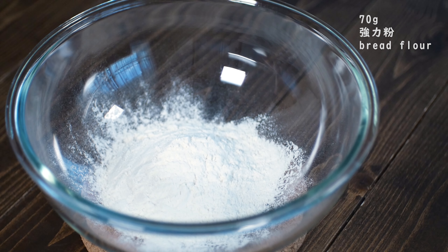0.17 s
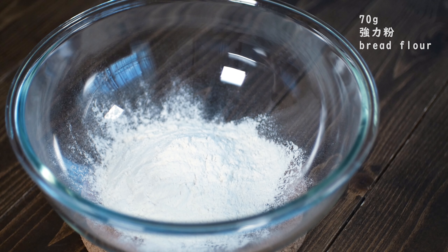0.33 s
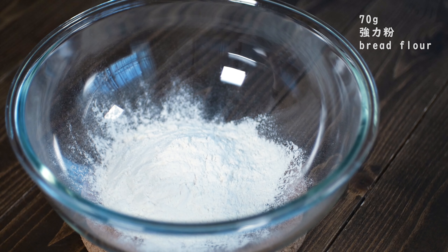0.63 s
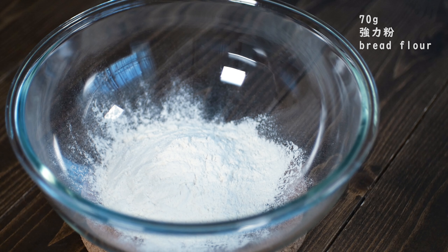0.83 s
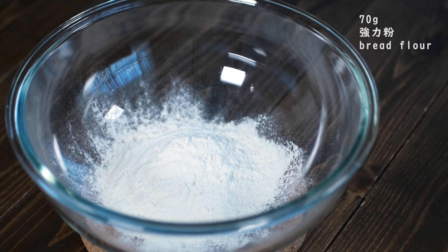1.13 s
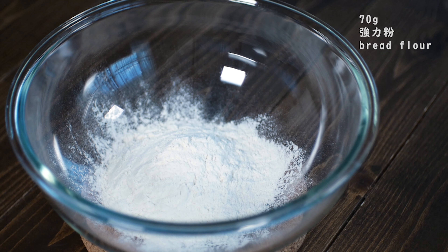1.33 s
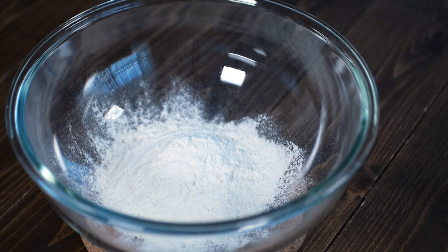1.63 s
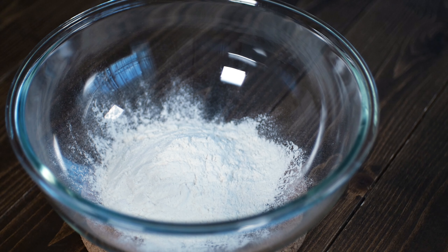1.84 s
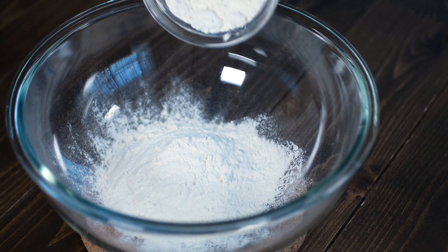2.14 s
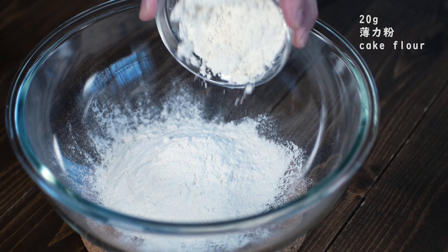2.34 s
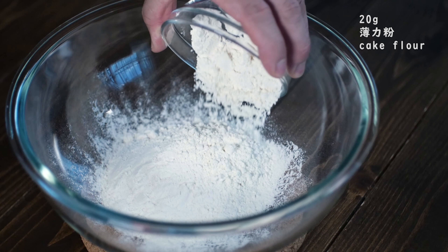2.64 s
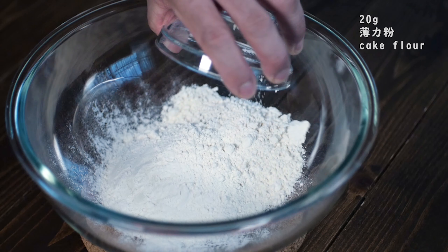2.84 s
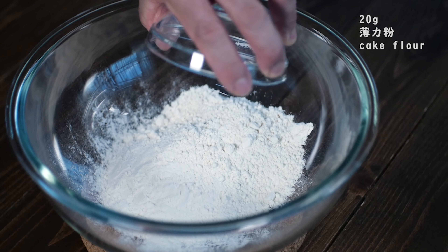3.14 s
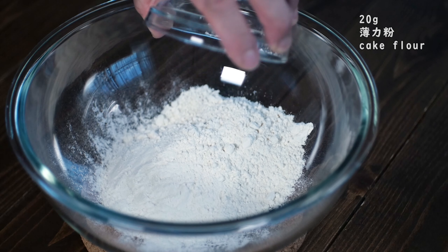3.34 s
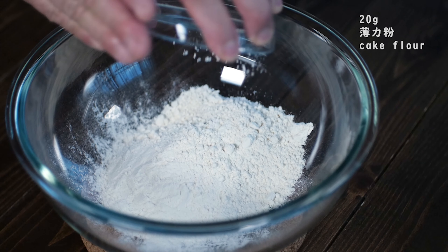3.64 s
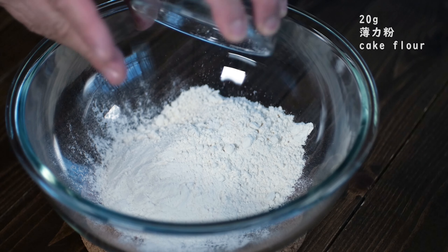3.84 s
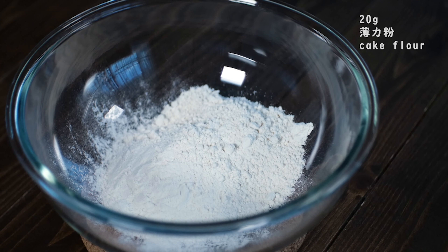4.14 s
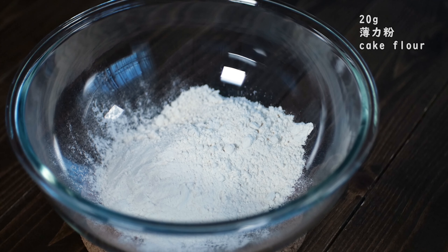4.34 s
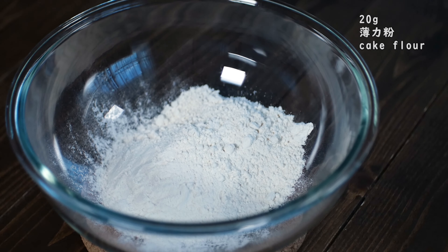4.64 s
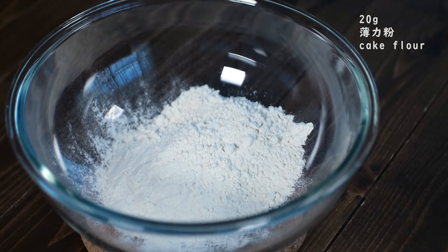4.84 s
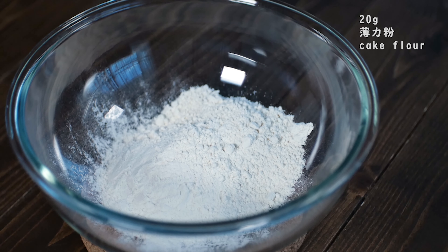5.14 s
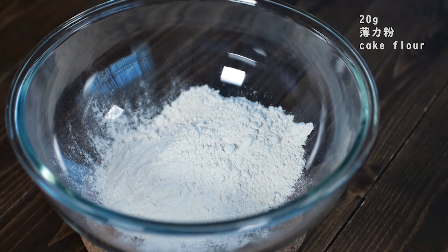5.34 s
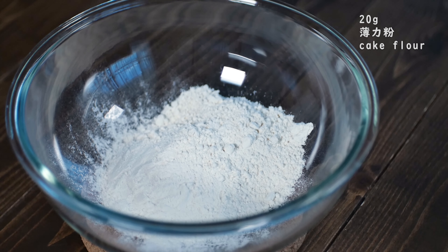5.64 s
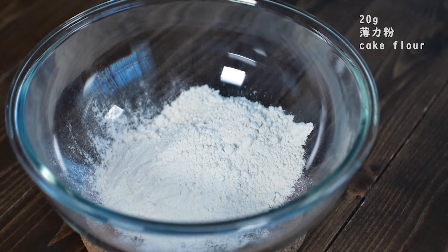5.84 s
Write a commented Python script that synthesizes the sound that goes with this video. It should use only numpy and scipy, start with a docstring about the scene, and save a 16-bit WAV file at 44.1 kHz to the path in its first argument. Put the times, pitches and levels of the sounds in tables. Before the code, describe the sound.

Close knocks of glass on wood, a brief scuff and light finger taps on glass, over faint sleeve rustle indoors.

```python
"""A glass dish knocks down on a wooden table, close to a near-mono microphone in a small dry room.
Its foot scuffs the wood, fingers pat a small empty dish, and more knocks follow at the end.
Each blow rings the table top or the glass and comes back briefly off the walls.
Behind them sleeves rustle over a soft room hush, and a far engine climbs slowly in pitch."""
import sys
import numpy as np
from scipy import signal
from scipy.fft import rfft, irfft, next_fast_len
from scipy.io import wavfile
from scipy.ndimage import uniform_filter1d

SR = 44100
rng = np.random.default_rng(int(sys.argv[2]) if len(sys.argv) > 2 else 0)


def to_wav(s):
    """Save 16-bit WAV."""
    ch = np.atleast_2d(s).T  # columns
    pcm = np.round(np.clip(ch, -1, 1) * 32767)  # PCM
    wavfile.write(sys.argv[1], SR, pcm.astype(np.int16))


N = 264159
LEAD = SR // 10  # samples ahead of t = 0, so a blow can already be sounding at the start

# Dishes landing near the microphone, rim edge by rim edge:
# t/s, blow/dB, contact/ms, bounce/dB, table ring/dB, board hum/dB, glass ring/dB
KNOCKS = [(-.012, -12.5, 0.89, 0.5, -17, -13, -60), (4.775, -42, 2, -10, -17, -6.5, -90),
          (5.3543, -17.5, 1.43, 0.5, -23.5, -13.5, -83), (5.4011, -18, 0.98, -2.5, -22.5, -8.5, -86),
          (5.6242, -14.5, 0.63, -8, -11.5, -25, -58), (5.661, -10.5, 0.36, -4, -12.5, -20, -41)]
# Modes that a landing excites: f/Hz, level/dB, t60/s
THUD_MODES = [(537, -3.5, 0.022), (820, -1.5, 0.0049), (1310, -0.5, 0.0039), (2136, -20, 0.018),
              (2530, -14, 0.015)]  # the contact itself
TABLE_MODES = [(329, 5, 0.094), (343, -4.5, 0.26), (385, 3, 0.22), (462, -17, 0.1), (526, -1, 0.16),
               (572, 3.5, 0.096), (620.4, 5.5, 0.23), (648, -4, 0.15), (687, 4, 0.067), (707, -4, 0.19),
               (824, 0, 0.12), (878, 5, 0.16), (923, -2, 0.28), (941, 2.5, 0.21), (1008.5, -3.5, 0.24),
               (1110, -7, 0.3), (1202, 9, 0.069), (1210, -28, 0.13), (1403, -6.5, 0.19), (1540, -15, 0.25),
               (1620, -1.5, 0.092)]  # the ring of the table top
BOARD_MODES = [(222.5, -21.5, 1), (310, -42, 0.067), (449.6, 0, 0.31), (410, -27, 0.14), (675, -2.5, 0.19),
               (140.6, -9, 0.22), (180, -24, 0.27), (588, -8, 0.16)]  # the lower hum of its board
BIG_DISH_MODES = [(1798, 0, .73), (2466, 2, .19), (1949, 0, .22), (2810, -10, .25)]
# The crack of glass on wood: f/Hz, level/dB
CRACK_COLOUR = [(800, -9), (2000, 12.5), (3500, -6), (5000, -8), (8000, -20.5), (15000, -43)]
def knocks():
    """Glass lands on wood with a push and one bounce: longer contact dulls the thud and the wood's ring."""
    bus = np.zeros((2, N + LEAD))
    t = np.arange(SR // 20) / SR
    bounce_s = 0.006585
    for s, db, contact_ms, bounce_db, table_db, board_db, glass_db in KNOCKS:
        push = np.sin(np.pi * np.arange(0, 1, 1000 / (contact_ms * SR))) ** 2
        push = undb(db) * push / push.sum()
        thud = signal.fftconvolve(ring(THUD_MODES), push)
        # a blow that rings the table more also cracks more and reaches the walls more
        crack = undb(db - 4 + 1.46 * table_db) * burst(np.exp(-t / 0.005), CRACK_COLOUR)
        room_db = table_db + 7
        add(bus, s, thud, room_db)
        add(bus, s + bounce_s, undb(bounce_db) * thud, room_db)
        add(bus, s, crack, room_db=0.5)
        add(bus, s, undb(glass_db) * ring(BIG_DISH_MODES), room_db=-12)
        for wood_db, modes in (table_db, TABLE_MODES), (board_db, BOARD_MODES):
            wood = ring(modes, spot_db=1.5, damp_s=0.33)  # the hand on the dish quiets the wood
            add(bus, s, undb(wood_db) * signal.fftconvolve(wood, push), room_db - 8)
    return highpass(bus, hz=156, order=3)  # wood and glass push hardly any air in the deep bass


# Fingers and nails on the small dish, close up:
# t/s, click/dB, spread/ms, flesh/dB, glass ring/dB, click tilt/(dB per octave)
PATS = [(0.678, -44.5, 2.7, -46, -75, -8.5), (0.691, -51, 2.1, -70, -80, 0),
        (3.6279, -28, 1.2, -31, -36, -1.5), (3.6813, -41, 0.83, -46, -63, -9.5),
        (3.759, -51.5, 4, -55, -77, 3), (3.765, -46, 1.6, -70, -60, 2), (3.836, -57.5, 8, -61, -80, 7),
        (3.865, -67, 7.1, -68, -77, 7), (4.4306, -38, 0.58, -54, -65, -6), (4.439, -54, 3.3, -62, -66, -2),
        (4.478, -66, 3.2, -64, -59, 2), (4.585, -74, 3, -67, -70, 0), (4.712, -61, 3, -70, -71, -9),
        (4.77, -64, 3, -64, -65, 3), (5.06, -67, 7.6, -72, -84, 19)]
# The click of skin or nail: f/Hz, level/dB
CLICK_COLOUR = [(300, -24), (1200, -4.5), (2500, 1), (4500, 5), (6000, 4.5), (10000, -5), (13000, 0),
                (15500, 0)]
# Modes that a pat excites: f/Hz, level/dB, t60/s
SLAP_MODES = [(354, -2, 0.028), (670, 8.5, 0.0067), (1260, -1, 0.017), (1770, 0.5, 0.016)]  # flesh on glass
SMALL_DISH_MODES = [(6970, -10, 0.2), (7130, -11.5, 0.2), (6990, -10, 0.33), (7100, -10, .12),
                    (8480, -6, 0.038), (4170, -25, .03)]  # the high ring
LOW_RIM_MODES = [(4006, -1.5, 0.087), (4120, 2, 0.056)]  # the rim's lowest pair
def pats(room_db=-11):
    """A finger meets the dish: a click or brush of skin, a soft slap and the ring of the damped glass."""
    bus = np.zeros((2, N + LEAD))
    t = np.arange(SR // 10) / SR
    hz, colour_db = np.transpose(CLICK_COLOUR)
    for s, click_db, spread_ms, flesh_db, glass_db, tilt in PATS:
        age = t * 1000 / spread_ms
        tilted = np.transpose([hz, colour_db + tilt * np.log2(hz / 4000)])
        click = burst(np.e * age * np.exp(-age), tilted)
        add(bus, s, undb(click_db) * click, room_db)
        add(bus, s, undb(flesh_db) * ring(SLAP_MODES), room_db - 2.5)
        add(bus, s, undb(glass_db) * ring(SMALL_DISH_MODES, spot_db=1.5), room_db)
        rim_db = -24 + 0.62 * glass_db  # the lowest pair grows more slowly than the high ring
        add(bus, s, undb(rim_db) * ring(LOW_RIM_MODES), room_db)
    return highpass(bus, hz=200, order=2)


# Runs of a dish's foot on the table, close up: t/s at full strength, level/dB, hold/s
SCUFFS = [(0.72, -41, 0.0034), (.729, -30.5, .014), (0.77, -41, 0.0032)]
# Glass rubbing on wood: f/Hz, level/dB
SCUFF_COLOUR = [(71, -31), (120, -11.5), (265, -5), (649, -8.5), (796, -2.5), (1270, -19), (1870, -12.5),
                (2160, -17), (2440, -3.5), (3300, -19.5), (3660, -16), (4960, -16.5), (5960, -21),
                (8250, -24.5), (15500, -42)]
# The sliding dish's faint ring: f/Hz, level/dB, t60/s
SCUFF_MODES = [(1561, -54, .9)]
def scuff(rise_db_per_s=3000, fall_db_per_s=2500):
    """The foot slides in dense slips of uneven size; each run rises, holds and dies."""
    slips = rng.standard_normal(N) * undb(1.5 * rng.exponential(size=N))
    slips *= rng.random(N) < 0.3
    t = np.arange(N) / SR
    envelope = np.zeros(N)
    for s, db, hold_s in SCUFFS:
        before, after = np.maximum(s - t, 0), np.maximum(t - s - hold_s, 0)
        envelope += undb(db - rise_db_per_s * before - fall_db_per_s * after)
    bus = np.zeros((2, N + LEAD))
    add(bus, 0, unit(shape(slips, SCUFF_COLOUR)) * envelope, room_db=-11)
    add(bus, 0.735, ring(SCUFF_MODES), room_db=-16)
    return bus


# Echoes off the surfaces nearest the table: delay/ms, level/dB
ECHOES = [(19, -14), (31, -13.5), (47, -15)]
# Faint stereo spread of the ringing tail: f/Hz, side minus mid/dB
TAIL_WIDTH = [(60, -32), (150, -39), (400, -73), (800, -87), (1500, -38), (2500, -22), (4400, -32),
              (8000, -15), (15000, -15)]
def room(sound, low_t60_s=0.29, treble_t60_s=0.21, rise_s=0.0023, knee_s=0.2):
    """A few hard echoes and a dense tail that swells and dies, treble first; mid and a weak side."""
    t = np.arange(SR // 2) / SR
    tails = []
    for _ in range(2):
        noise = rng.standard_normal(len(t))
        low = shape(noise, [(1500, 5.0), (4000, -44)])
        tail = low * decay(t, low_t60_s) + (noise - low) * decay(t, treble_t60_s)
        tail *= (1 - np.exp(-t / rise_s)) * np.exp(-(t / knee_s) ** 2)
        tails.append(undb(8) * tail / np.sqrt(np.sum(tail ** 2)))
    mid, side = tails
    for ms, db in ECHOES:
        mid[int(ms * SR / 1000)] += undb(db)
    side = shape(side, TAIL_WIDTH)
    return np.array([signal.fftconvolve(sound, response)[:len(sound)] for response in (mid, side)])


# Sleeves and hands moving at the table: t/s, level/dB
RUSTLE_LEVEL = [(0.0, -54), (0.18, -64.5), (0.55, -61), (0.68, -59.5), (0.83, -65.5), (1.08, -64.5),
                (1.5, -60), (1.67, -64.5), (1.88, -65.5), (2.1, -61), (2.37, -65.5), (3.15, -65.5),
                (3.33, -59.5), (3.55, -56), (3.85, -61), (4.3, -60.5), (4.99, -65), (5.27, -67),
                (5.99, -63)]
# Cloth rubbing: f/Hz, level/dB
RUSTLE_COLOUR = [(300, -7), (1000, 6), (2500, 0.5), (5000, -3), (9000, -6), (15000, -10.5)]
def sleeves():
    """Cloth rubs as the hands move: noise that swells and sinks, its topmost treble eased down."""
    cloth = unit(shape(rng.standard_normal(N), RUSTLE_COLOUR))
    top = shape(cloth, [(7000, -33), (11000, -4)])
    softened = cloth - top + top * undb(-2.5)
    return softened * undb(curve(RUSTLE_LEVEL) + 0.5 * walk(14))


# Room tone around the microphone: f/Hz, level/dB
HUSH_COLOUR = [(15, -76), (25, -34), (64, -6), (84, -9.5), (107, -8.5), (222, -4.5), (260, -4.5),
               (423, -1.5), (459, -6.5), (584, -2.5), (829, -3.5), (1500, -10.5), (2370, -23.5),
               (15600, -38.5)]
# Faint stereo spread of the hush: f/Hz, side minus mid/dB
HUSH_WIDTH = [(60, -14), (110, -32), (200, -28.5), (380, -30.5), (700, -32), (1290, -33), (2380, -12.5),
              (4400, -5.5), (8120, -1), (15000, 2)]
# Narrow bands where the room favours the hush: f/Hz, width/Hz, level/dB
ROOM_HUMS = [(224.3, 11, -67.5), (420.2, 13, -69.5)]
def hush(level_db=-54.5):
    """Soft noise with two room resonances, its bass and middle wavering a little; mid and side."""
    low, high = (shape(rng.standard_normal(N), HUSH_COLOUR) for _ in range(2))
    gain = undb(level_db) / np.std(low)
    crossover = [(800, -1.5), (2500, -15.5)]
    bass = shape(low, crossover) * undb(0.09 * walk(2.3) + 0.56 * walk(14))
    treble = high - shape(high, crossover)
    mid = gain * (bass + treble)
    for hz, width_hz, db in ROOM_HUMS:
        resonance = signal.iirpeak(hz, hz / width_hz, fs=SR)
        mid += undb(db) * unit(signal.lfilter(*resonance, rng.standard_normal(N)))
    side = gain * shape(shape(rng.standard_normal(N), HUSH_COLOUR), HUSH_WIDTH)
    return mid, side


# The far engine as it reaches the room: t/s, level/dB
ENGINE_LEVEL = [(0.0, -56), (0.28, -72), (0.8, -63.5), (0.99, -74), (1.31, -62.5), (2.06, -67),
                (2.2, -76.5), (3.75, -74.5), (3.81, -69), (4.19, -73), (4.28, -65), (4.81, -74), (5.2, -88)]
def engine(idle_hz=62.7, climb_from_s=0.67, climb_hz_per_s=11):
    """A far engine idles, then gains speed evenly: one low tone of wavering level."""
    hz = idle_hz + climb_hz_per_s * np.maximum(np.arange(N) / SR - climb_from_s, 0)
    level = undb(curve(ENGINE_LEVEL) + 0.79 * walk(5.3))
    return np.sqrt(2) * level * np.sin(2 * np.pi * np.cumsum(hz) / SR)


def ring(modes, spot_db=0, damp_s=9):
    """Modes decay after a blow; with spot_db, the struck spot scatters their strengths and signs."""
    hz, db, t60 = np.transpose(modes)[:, :, None]
    t = np.arange(int(SR * min(t60.max(), 0.5))) / SR
    gain = undb(db + spot_db * rng.standard_normal(hz.shape))
    if spot_db:
        gain *= rng.choice([-1, 1], hz.shape)
    fade = np.minimum(1, 5 * (1 - t / t[-1])) * np.exp(-(t / damp_s) ** 2)
    return np.sum(gain * np.sin(2 * np.pi * hz * t) * decay(t, t60), axis=0) * fade


def burst(envelope, colour):
    """A short noisy contact, evened out in spectrum, then coloured; it carries the envelope's energy."""
    spectrum = rfft(rng.standard_normal(len(envelope)) * envelope)
    even = irfft(spectrum / np.abs(spectrum) ** 0.8, len(envelope))
    contact = shape(even, colour) * np.linspace(1, 0, len(even)) ** 4
    return contact * np.sqrt(np.sum(envelope ** 2) / np.sum(contact ** 2))


def add(bus, s, sound, room_db):
    """Place a sound at time s: row 0 goes straight to the microphone, row 1 to the walls."""
    start = int(s * SR) + LEAD
    part = sound[:bus.shape[1] - start]
    bus[:, start:start + len(part)] += [part, undb(room_db) * part]


def shape(x, colour):
    """Colour x by (f/Hz, level/dB) points."""
    hz, db = np.transpose(colour)
    size = next_fast_len(len(x))
    f = np.maximum(np.arange(size // 2 + 1) * SR / size, 1)
    gain = undb(np.interp(np.log(f), np.log(hz), db))
    return irfft(rfft(x, size) * gain, size)[:len(x)]


def walk(rate_hz):
    """Random levels, each held for 1 / rate_hz seconds, smoothed twice."""
    hold = int(SR / rate_hz)
    steps = np.repeat(rng.standard_normal(N // hold + 1), hold)
    return uniform_filter1d(uniform_filter1d(steps, hold), hold)[:N]


def curve(points):
    """Join (t/s, level/dB) points at every sample."""
    return np.interp(np.arange(N) / SR, *np.transpose(points))


def highpass(x, hz, order):
    return signal.sosfilt(signal.butter(order, hz, "high", fs=SR, output="sos"), x)


def decay(t, t60):
    return np.exp(-np.log(1000) * t / t60)


def undb(db):
    return 10 ** (np.asarray(db) / 20)


def unit(x):
    return x / np.sqrt(np.mean(x ** 2))


def scene():
    """Dishes, sleeves and engine sit dead centre; the ringing tail and the hush spread faintly."""
    direct, to_walls = knocks() + pats() + scuff()
    room_mid, tail_side = room(to_walls)[:, LEAD:]
    hush_mid, hush_side = hush()
    mid = direct[LEAD:] + room_mid + sleeves() + hush_mid + engine()
    side = tail_side + hush_side
    return np.array([mid + side, mid - side])


def record(dry):
    """The microphone drops the deepest bass and the recorder cuts the top."""
    top_cut = signal.ellip(10, 0.2, 60, 15750, fs=SR, output="sos")
    return signal.sosfilt(top_cut, highpass(dry, hz=25, order=2))


dry = scene()
out = record(dry)
to_wav(out)
```